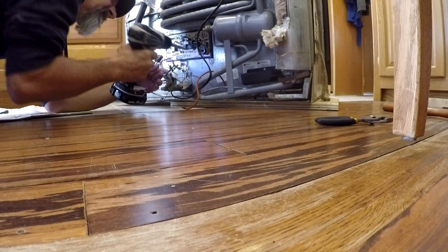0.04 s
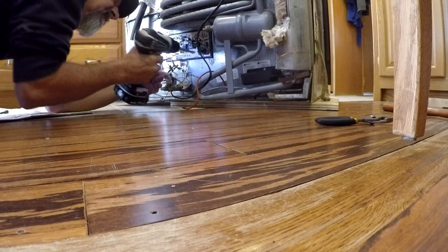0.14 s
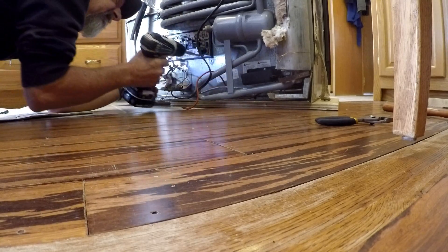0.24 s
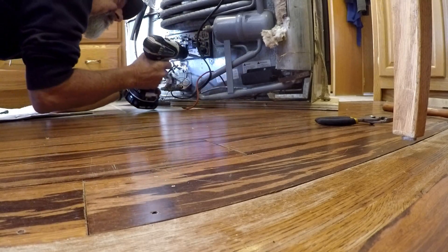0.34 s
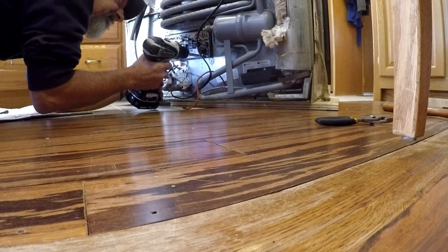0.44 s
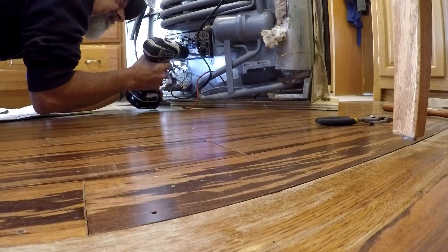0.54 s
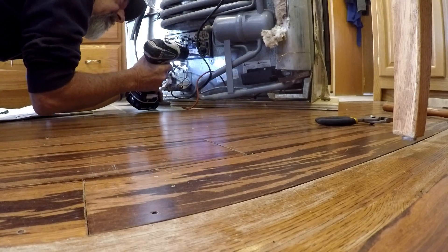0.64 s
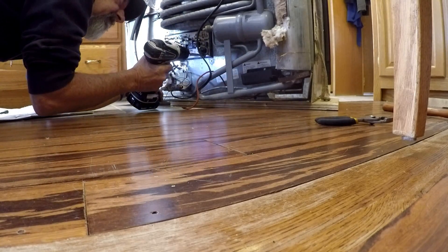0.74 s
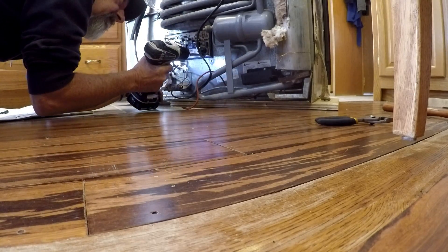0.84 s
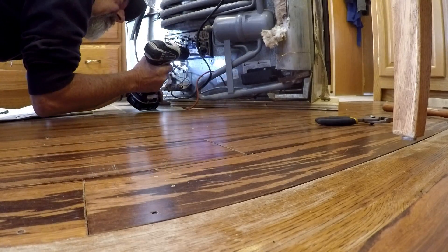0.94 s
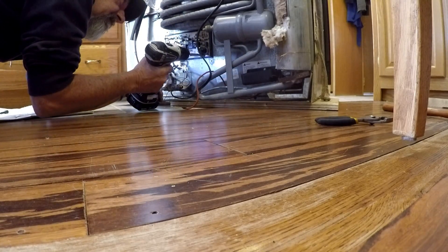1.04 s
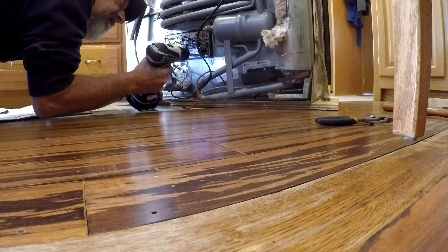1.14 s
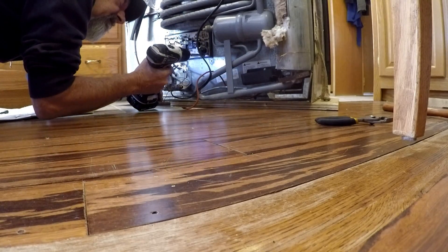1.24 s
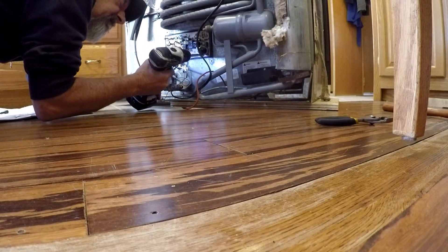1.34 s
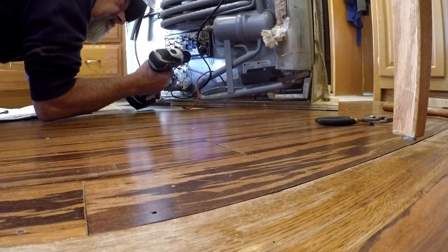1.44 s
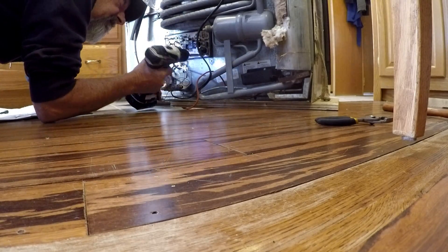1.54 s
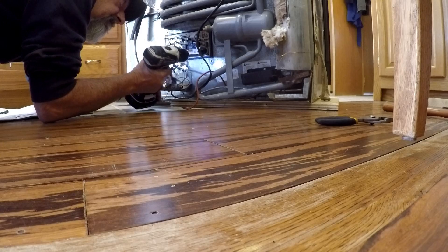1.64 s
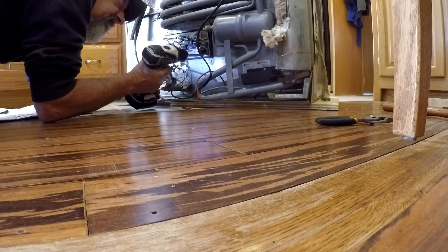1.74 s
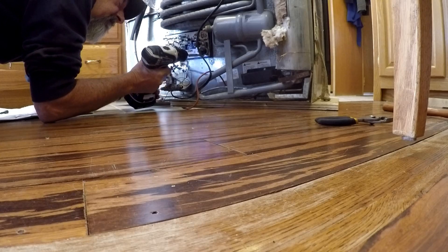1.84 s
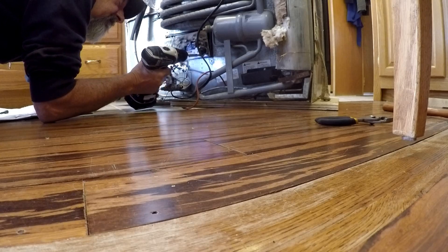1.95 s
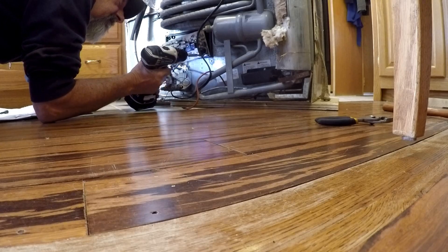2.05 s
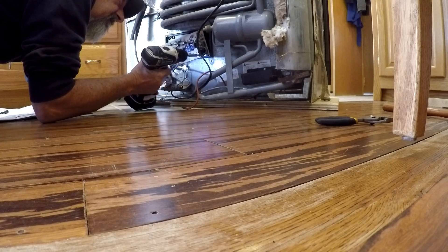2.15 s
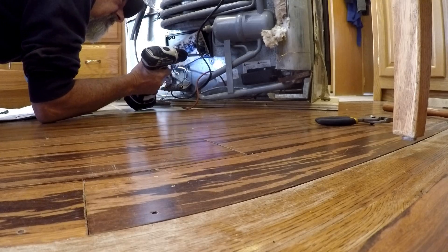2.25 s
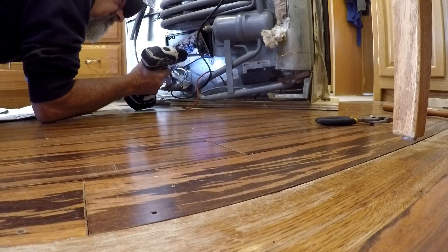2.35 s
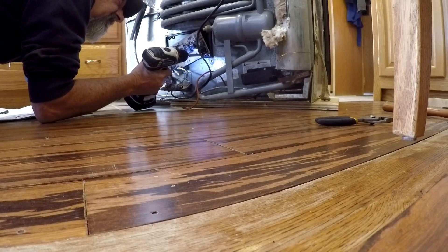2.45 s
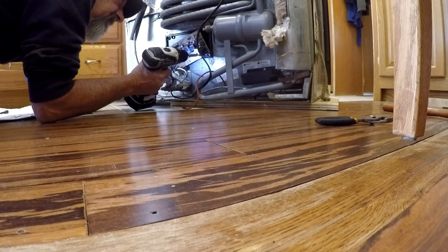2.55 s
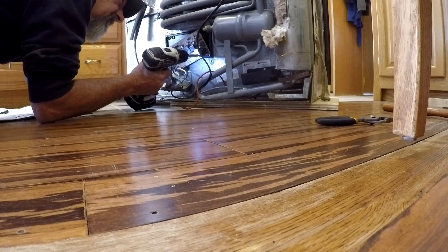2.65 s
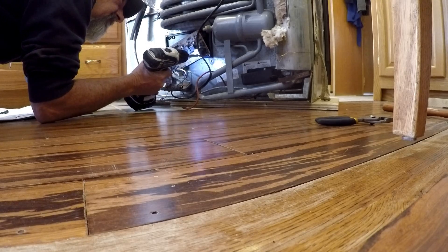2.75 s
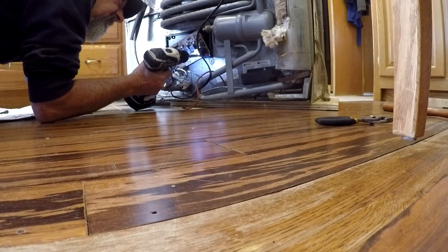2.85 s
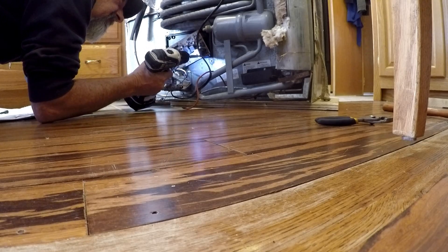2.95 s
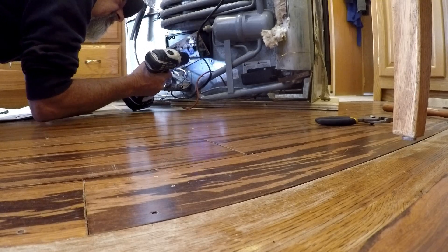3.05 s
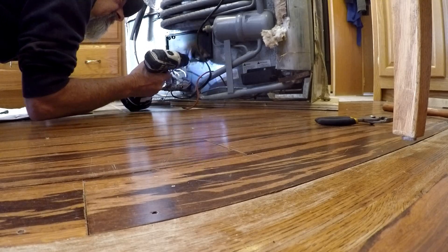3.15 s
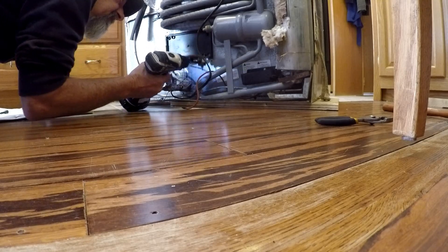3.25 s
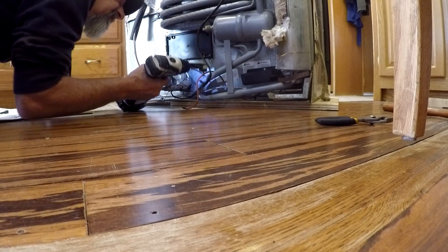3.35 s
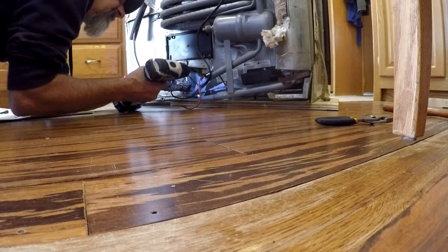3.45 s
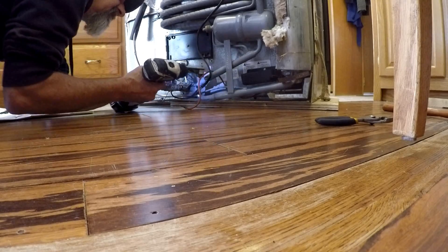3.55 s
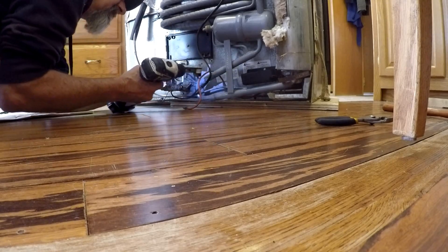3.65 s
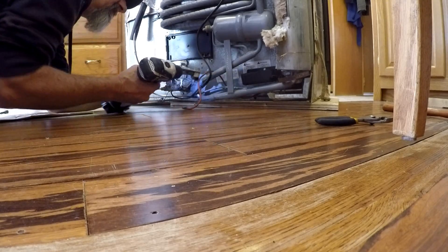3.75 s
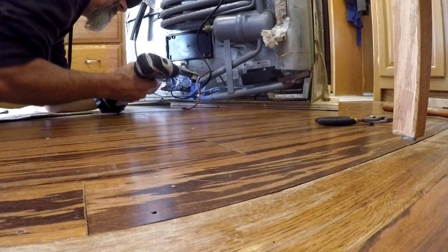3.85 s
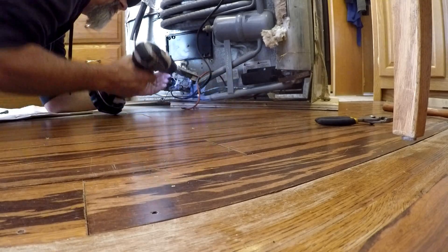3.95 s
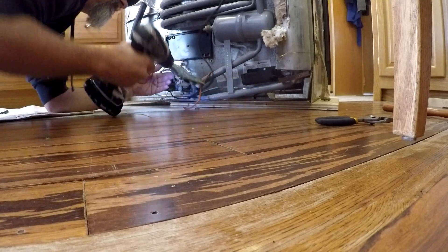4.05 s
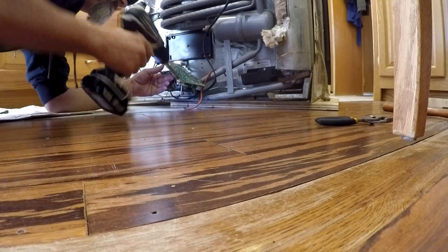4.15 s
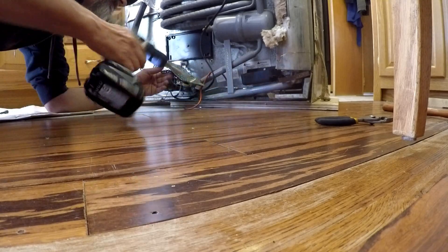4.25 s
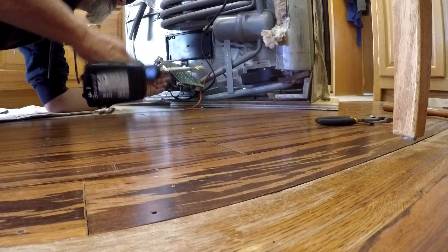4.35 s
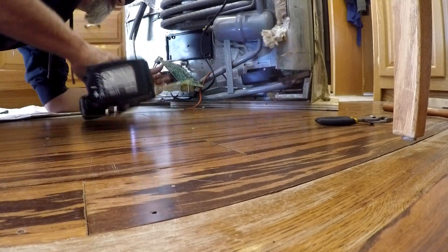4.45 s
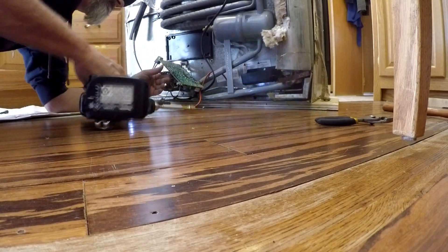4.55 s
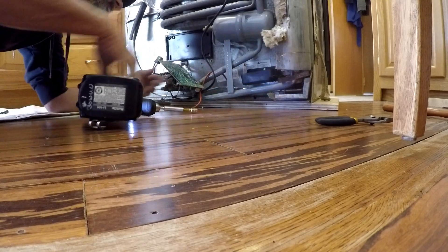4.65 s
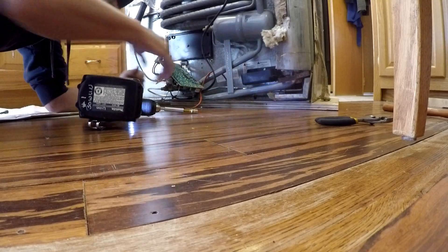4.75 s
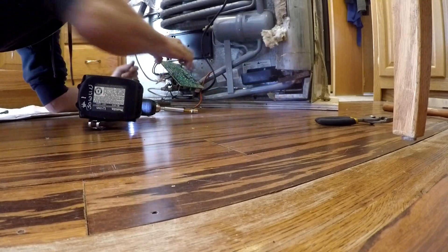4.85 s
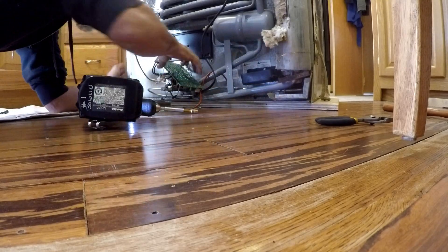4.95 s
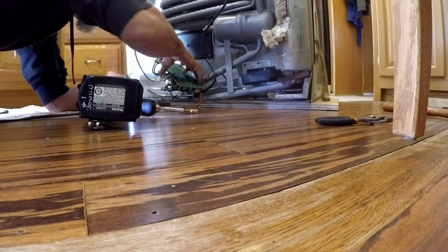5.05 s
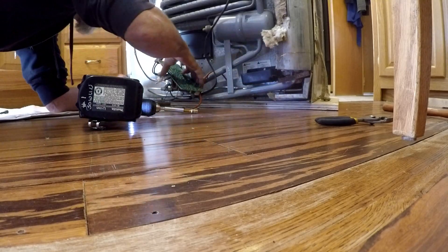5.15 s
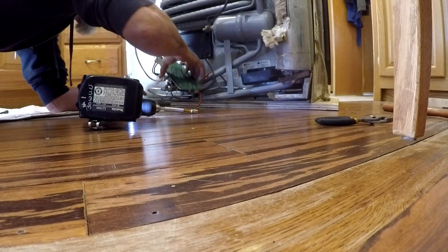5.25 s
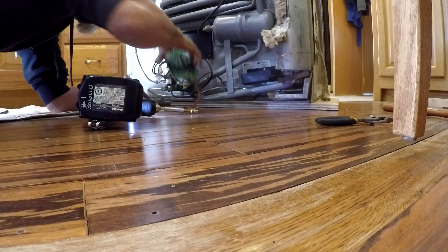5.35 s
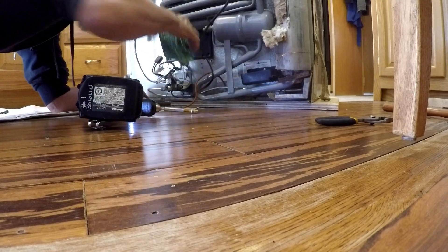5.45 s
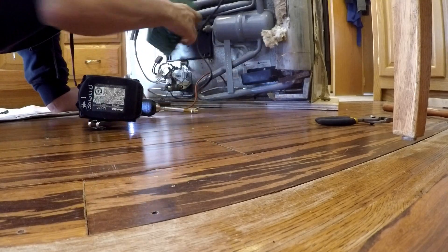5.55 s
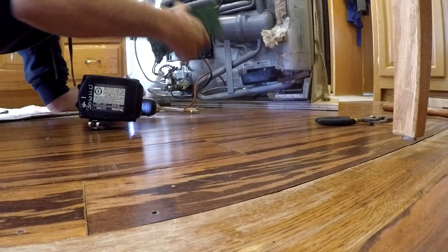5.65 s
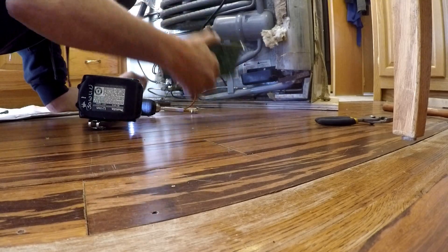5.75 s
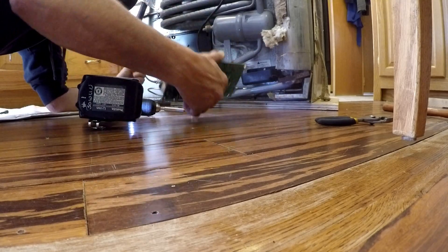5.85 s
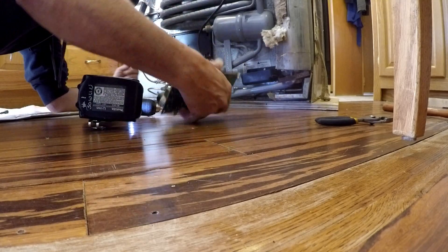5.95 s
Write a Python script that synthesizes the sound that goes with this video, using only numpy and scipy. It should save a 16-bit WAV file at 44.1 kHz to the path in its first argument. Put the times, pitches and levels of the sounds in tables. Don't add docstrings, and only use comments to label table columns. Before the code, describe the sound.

Knocks and thuds on floorboards, a cordless drill blips then whirs for about a second, then metal parts clink and the drill is set down.

```python
import sys
import numpy as np
from scipy import signal
from scipy.fft import rfft, irfft, next_fast_len
from scipy.io import wavfile
from scipy.ndimage import uniform_filter1d, map_coordinates

SR = 44100
rng = np.random.default_rng(int(sys.argv[2]) if len(sys.argv) > 2 else 0)


def generate_wav(sig):
    pcm = np.round(np.clip(np.atleast_2d(sig).T, -1, 1) * 32767).astype(np.int16)
    wavfile.write(sys.argv[1], SR, pcm)


def boost_factor(decibels):
    exponent = np.asarray(decibels, float) / 20
    return 10 ** exponent


N = 264600

# [f/Hz, density/dB per Hz]
BOARD_SPECTRUM = [(15, -45), (25, 1), (65, -5.5), (98, 3), (156, -2.5), (177, -12), (193, -4.5), (254, -6),
                  (331, -8), (379, -17), (430, -14.5), (500, -28), (650, -38), (1100, -120)]
MURMUR_SPECTRUM = [(210, -23.5), (350, -1.5), (431, -14.5), (538, -5), (854, -11), (1020, -14),
                   (1130, -18.5), (2200, -27.5), (2860, -36), (4840, -120)]
RUSTLE_SPECTRUM = [(880, -8), (1500, -3), (2310, 2.5), (3720, -1.5), (4940, -2), (5690, -3), (9880, -8.5),
                   (12800, -40), (21700, -120)]
# [f/Hz, level/dB]
FRIDGE_LINES = [(191.3, -2), (265.2, -7.5), (57.7, -6.5)]
# [t/s, gain/dB]
ROOM_GAIN = [(0, -7), (.27, -1), (.45, -2), (.75, 1), (1.27, 4), (1.6, 5), (1.82, 0), (2.06, -10), (3.3, 2),
             (3.5, -7), (3.72, -4), (3.95, -7), (4.5, -3), (4.76, -1), (5.05, -8), (5.31, -3), (5.52, 1),
             (6, 1)]
# [(start/s, end/s, level/dB, swell/dB per s), bands of (f/Hz, width/Hz, level/dB)]
DRAGS = [
    ((-.1, .42, -61.5, 24), [(7720, 250, -1), (4750, 1700, -3)]),
    ((1.25, 2.02, -56, 5), [(2850, 96, 0)]),
    ((4.21, 4.375, -32.5, -3), [(2140, 410, 4), (3630, 460, 5), (5000, 900, 0), (7700, 700, 0), (9500, 900, -6.5)]),
    ((4.11, 4.31, -30, 6), [(262, 30, 0), (195, 24, -1)]),
    ((5.78, 5.87, -42.5, 8), [(1450, 900, 17), (2300, 880, -24)]),
]
# [t/s, peak/dB, f/Hz, joist level/dB]
BOARD_BLOWS = [(.804, -19, 206, -21), (1.035, -13, 196, -16), (1.059, -12.5, 348, -14),
               (1.197, -23, 183, -14), (1.345, -24, 194, -14), (1.536, -7, 261, -5.5),
               (1.584, -4, 205.5, -12), (1.601, .5, 220.6, -38), (1.619, -5, 235, -28),
               (1.831, -8, 203, -15), (1.896, -4, 201.5, -16), (1.995, -2, 274, -7),
               (3.416, -25.5, 172, -26), (3.482, -18.5, 179, -1.5), (4.105, -15, 269, -12),
               (4.15, -16, 190, -1), (4.204, 1, 175, -24), (4.229, -19, 191.5, -1.5),
               (4.344, -21.5, 195, -3.5), (4.747, 1.5, 196, -12), (4.7475, -8, 330, -30),
               (4.8145, -11, 340, -30), (4.21, -6, 175, -30), (3.612, -26, 190, 3), (3.672, -24, 200, 1),
               (1.66, -15, 330, -20), (4.816, -10, 194, 1), (4.85, -22, 159, 4), (4.881, -18.5, 171, 4),
               (4.91, -29, 132, 10), (4.997, -22, 141, 4)]
# [t/s, peak/dB, f/Hz]
BIT_JOLTS = [(1.879, -16, 240), (1.909, -12, 330), (1.921, -11, 260), (1.941, -9, 190), (3.43, -18, 200),
             (2.167, -21, 147), (2.289, -15, 310), (2.384, -15, 178), (2.445, -21, 277), (2.579, -13, 317),
             (2.636, -7, 200), (2.674, -10, 204.4), (2.73, -9, 302), (2.771, -15, 319), (2.929, -18, 310),
             (3.033, -17, 291), (3.189, -12, 332), (3.2, -12, 196), (3.255, -12, 190), (3.309, -19, 132)]
# [f/Hz, t60/s]
JOIST_MODE = (101.2, 0.18)
# [t/s, peak/dB, body level/dB, t60/s]
PANEL_HITS = [(.7352, -40, 8, .12), (.8104, -42.5, 9, .14), (.8939, -33.5, -6, .08),
              (1.0535, -27.5, 1, .07), (1.1694, -48, 19.5, .13), (1.3389, -41, -14, .07),
              (1.3694, -38, 6, .053), (1.5354, -22, 2, .18), (1.5844, -26, 0, .042),
              (1.6008, -13.5, 1, .098), (1.6457, -32, -1, .12), (1.8477, -36, 3, .2),
              (1.9944, -24, 1, .052), (2.0946, -41, 4, .12), (2.1176, -26, -5, .1),
              (3.4174, -8.5, -6.5, .06), (3.6591, -29, -15, .12), (3.8372, -34.5, -6, .063),
                  (4.4094, -48.5, 17, .08), (4.8145, -27.5, 2, .07), (4.8823, -15, -2, .07),
                  (4.9896, -30, 8, .092), (5.0404, -35.5, 10, .1), (5.2854, -59.5, 30, .04),
                  (5.5494, -39, 9.5, .13), (5.6974, -27.5, -4, .08), (5.7768, -28, -25, .2),
                  (5.8204, -29, -5, .11), (5.901, -32, -20, .07)]
# [t/s, peak/dB, ring f/Hz, mid level/dB, t60/s]
PLASTIC_HITS = [(.6983, -37.5, 2400, -3, .07), (1.7569, -42, 4400, 5, .05), (1.712, -48, 2800, 10, .07),
                (1.538, -27, 2050, 6, .1), (1.6045, -20, 2000, 3, .1), (1.8986, -15, 2000, 7, .08),
                (3.4381, -14, 2090, 1, .048), (3.5049, -11, 3450, -8, .095), (3.5734, -40, 2770, 4, .056),
                (3.6062, -29.5, 3380, 1, .07), (3.6292, -22, 1810, -5.5, .055),
                (3.6794, -26, 2370, -10, .084), (3.7005, -32, 2540, -1, .088),
                (4.0043, -13, 2520, -4, .042), (4.0721, -19.5, 2270, -1, .065),
                (4.1061, -14, 2590, -2.5, .052), (4.1979, -16, 2330, -2, .03), (4.2028, -17, 1910, -2, .05),
                (4.1575, -26, 2500, -2, .05), (4.03, -36, 2500, -8, .08), (4.224, -24, 2600, 0, .04),
                (4.328, -27, 2000, 3, .04), (4.333, -27, 4000, 0, .04), (4.359, -24, 2310, 3, .06),
                (4.8335, -39, 4000, 0, .04), (4.959, -40, 4100, 0, .03), (4.2832, -20, 3790, -3, .11),
                (4.3525, -21, 2870, -8, .06), (4.3694, -33, 2210, 7, .076), (4.4812, -36, 3080, -2, .09),
                (4.7054, -46.5, 2300, 14, .07), (4.8479, -15.5, 2680, -3, .05),
                (4.9097, -15, 2610, -3, .045), (4.9654, -50, 2700, 15, .044),
                (5.6064, -45.5, 2400, 13, .07)]
# [t/s, peak/dB, ring f/Hz, mid level/dB, t60/s]
STEEL_HITS = [(1.8743, -21, 6680, -6, .15), (2.139, -18, 3900, -3, .07), (3.4835, -7.5, 8130, -16, .063),
              (3.7289, -10, 8030, -21, .14), (3.8798, -7.5, 7900, -10, .1), (3.885, -9, 7220, -14, .1),
              (3.8965, -18, 7670, -12, .1), (3.933, -18, 4700, -8, .05), (3.9265, 0, 7000, -13, .07),
              (3.9514, -4.5, 7060, -20, .065), (4.148, -24, 6250, -8, .05), (4.2297, -15, 7900, -6, .06),
              (4.2465, -19, 7900, -8, .05), (4.298, -24, 8500, -10, .04), (4.306, -24, 8500, -10, .04),
              (4.343, -22, 7500, -20, .03), (4.3658, -22, 5800, -12, .04), (4.256, -25, 5380, -10, .11),
              (4.3155, -20, 3850, -8, .037), (4.7465, -19, 4000, 3, .05), (5.5248, -16, 4660, -14, .085),
              (5.6531, -24, 6560, -12, .15)]
# [f/Hz, level/dB, t60/s]
SHELL_MODES = [(720.5, 1, 0.1), (999, 0.5, 0.093), (1230, -16.5, 0.13)]
# [t/s, level/dB, f/Hz, t60/s]
KNOCKS = [(0.814, -29, 1010, .1), (1.172, -25, 1012, 0.13), (1.899, -15, 780, .07), (2.139, -15, 900, .05),
          (3.884, -31, 2692, .2), (3.884, -24, 5001, .06), (3.927, -19, 800, .08), (3.927, -17, 3600, .025),
          (3.952, -20, 3600, .02), (4.0045, -14, 2500, .015), (4.222, -24, 9700, .03),
          (4.884, -19, 720, .1), (4.991, -25, 720, .1), (4.993, -30, 3200, .03), (5.042, -27, 750, .1),
          (4.748, -17, 720, .06), (4.849, -20, 5400, .015), (4.911, -20, 5200, .015),
          (3.4172, -12, 900, 0.035), (3.4175, -16, 2000, .02), (3.484, -30, 8130, .1),
          (3.506, -28, 8130, .1), (4.2297, -21, 7900, .03), (4.2465, -21, 7900, .035),
          (4.257, -28, 5380, .06), (4.2297, -23, 3630, .04), (3.815, -38, 2600, .03),
          (4.752, -16, 8060, 0.082), (4.885, -24, 8050, 0.046), (5.558, -29, 1050, .05),
          (5.702, -33, 1150, .04)]
# [f/Hz, level/dB, t60/s]
SCREW_MODES = [(2939, -24, .15), (5965, -10, .22), (6300, -3, .05), (6568, -8, .1), (7111, -5, .08),
               (7620, -12, .3), (7865, -15, .3), (5000, -14, .1), (8032, -2, .07), (8780, -6, .06),
               (9582, -8, .08)]
# [t/s, level/dB]
SCREW_IMPACT = (3.729, -17.5)
# [shaft start/s, brake/s, top mesh f/Hz, spin-up/s, braking/Hz per s2]
BLIP_TRIGGER = (1.9, 1.96, 2060, .014, 3e6)
RUN_TRIGGER = (2.118, 3.36, 2872, .039, 6e4)
# [t/s, air and brush noise level/dB]
BLIP_EFFORT = [(1.878, -35), (1.908, -22.5), (1.972, -21), (1.979, -29), (1.997, -36)]
RUN_EFFORT = [(2.121, -33), (2.142, -22), (2.166, -20.5), (2.24, -22.5), (2.572, -23.5), (2.584, -21),
              (2.604, -31), (2.926, -24), (3.395, -23), (3.416, -29), (3.432, -38)]
MESH_MULTIPLES = [.3, 1, 2, 3, 4, 5]
# [level while screw bites/dB, level once free/dB, swell after/dB per s]
MESH_BITE = [(3, 1, 1), (3.5, .5, 0), (4, -2.5, 10), (-8, -3.5, 9), (0, 0, 0), (-6, -6, 0)]
# [gain at standstill/dB], nothing at full speed
MESH_STRAIN_DB = [10, 1.5, 3, 34, 14, 12]
# [f/Hz, level/dB]
CASING_RADIATION = [(500, -4), (860, 2.5), (1500, 10), (2200, 9), (2870, -.5), (4000, 11), (5000, 7.5),
                    (5730, -0.5), (6500, -12), (8200, -9), (8600, 8.5), (9000, -5)]
# [f/Hz, density/dB per Hz]
WHIR_SPECTRUM = [(240, -22.5), (400, -13.5), (582, -2.5), (804, -12.5), (871, -8.5), (907, -7.5),
                 (1320, -12), (2800, -11), (3240, -3), (6430, -2.5), (7350, -1.5), (8410, -2.5), (9880, -9),
                 (12800, -13), (21700, -120)]
# [f/Hz, width/Hz, level/dB]
CASING_MODES = [(6550, 470, 2), (2300, 200, 9.5), (8480, 2100, -3.5)]
SHAKEN_MODES = [(203, 34, 2.5), (324, 36, 2), (570, 90, -5), (700, 60, -10)]


def seconds(length):
    return np.arange(length) / SR


def sine(hz, t):
    return np.sin(2 * np.pi * hz * t)


def unit(x):
    return x / np.sqrt(np.mean(x ** 2) + 1e-20)


def along(points, hz):
    f, v = np.transpose(points)
    return np.interp(np.log(hz + 1), np.log(f + 1), v)


def curve(rows):
    s, value = np.transpose(rows)
    return np.interp(seconds(N), s, value)


def wobble(rate_hz):
    coarse = np.arange(0, N + 8, 8)
    knots = rng.standard_normal(int(N * rate_hz / SR) + 4)
    return np.interp(np.arange(N), coarse, map_coordinates(knots, [coarse * rate_hz / SR]))


def filtered(x, response):
    m = next_fast_len(x.shape[-1] + 2048)
    return irfft(rfft(x, m) * response(np.fft.rfftfreq(m, 1 / SR)), m)[..., :x.shape[-1]]


def resonances(bands):
    return lambda f: sum(boost_factor(db) * 1j * f * w / (c * c - f * f + 1j * f * w) for c, w, db in bands)


def rush(spectrum, grain_db, grain_hz):
    flicker = boost_factor(grain_db * wobble(grain_hz)) * rng.standard_normal(N)
    return unit(filtered(flicker, lambda hz: boost_factor(along(spectrum, hz))))


def add(track, s, sound):
    part = track[round(s * SR):][:len(sound)]
    part += sound[:len(part)]


def lingering(rows, db, t60_s):
    out, t = np.zeros(N), seconds(SR // 2)
    for s, peak_db, *_ in rows:
        add(out, s, boost_factor(peak_db + db - 60 * t / t60_s) ** 2)
    return out


def bed_level(quiet_db, rides, driven_db, running):
    return np.hypot(boost_factor(quiet_db + rides * curve(ROOM_GAIN)), running * boost_factor(driven_db))


def fridge():
    hum = np.zeros(N)
    for hz, db in FRIDGE_LINES:
        phase = 2 * np.pi * np.cumsum(hz * (1 + 0.0115 * wobble(15))) / SR
        hum += boost_factor(db + 1.2 * wobble(9)) * np.sin(phase)
    return boost_factor(-30 + .9 * curve(ROOM_GAIN)) * hum


def board_rumble(lumps, running):
    after = lingering(BOARD_BLOWS, db=-20, t60_s=.5)
    level = np.sqrt(bed_level(-29.5, .75, -24, running) ** 2 + after)
    return boost_factor(-3.0) * level * unit(lumps * rush(BOARD_SPECTRUM, grain_db=2.0, grain_hz=50))


def murmur(lumps, running):
    level = bed_level(-40, 1.1, -34.5, running)
    return level * unit(lumps * rush(MURMUR_SPECTRUM, grain_db=2, grain_hz=60))


def rustle(running):
    stir = lingering(PLASTIC_HITS, db=-31, t60_s=.45)
    level = np.sqrt(bed_level(-50, .6, -40, running) ** 2 + stir)
    return level * rush(RUSTLE_SPECTRUM, grain_db=1.5, grain_hz=30)


def surroundings(chuck, running):
    lumps = boost_factor(3.8 * chuck + 1.28 * wobble(18))
    return fridge() + board_rumble(lumps, running) + murmur(lumps, running) + rustle(running)


def drags():
    out, t = np.zeros(N), seconds(N)
    for (start, end, db, swell_db), bands in DRAGS:
        outside_s = np.maximum(np.maximum(start - t, t - end), 0)
        edge_db = 30 * outside_s / (end - start) / .2
        level_db = db + swell_db * (np.clip(t, start, end) - start) - edge_db
        grit = boost_factor(4 * wobble(400) + 2.9 * wobble(70)) * rng.standard_normal(N)
        out += boost_factor(level_db) * unit(filtered(grit, resonances(bands)))
    return out


def thuds():
    out, t = np.zeros(N), seconds(SR // 4)
    joist_hz, joist_t60_s = JOIST_MODE
    joist = boost_factor(-60 * t / joist_t60_s) * sine(joist_hz, t)
    blows = [(s, db, hz, .048 * boost_factor(-.35 * db), joist_db) for s, db, hz, joist_db in BOARD_BLOWS]
    jolts = [(s, db, hz, .1, -15) for s, db, hz in BIT_JOLTS]
    for s, db, hz, t60_s, joist_db in blows + jolts:
        board = sine(hz, t) + 0.45 * sine(1.6 * hz, t)
        blow = boost_factor(-60 * t / np.clip(t60_s, .025, .16)) * board + boost_factor(joist_db) * joist
        add(out, s, boost_factor(db - 0.5) * blow * (1 - np.exp(-t / 0.0021)))
    return out


def contacts():
    panel = [(s, db, .6 * body_db - 1.5, body_db, 960, t60_s)
             for s, db, body_db, t60_s in PANEL_HITS]
    parts = [(s, db, mid_db, mid_db - 11, hz, t60_s) for s, db, hz, mid_db, t60_s in PLASTIC_HITS]
    steel = [(s, db, mid_db, mid_db - 1.5, hz, t60_s) for s, db, hz, mid_db, t60_s in STEEL_HITS]
    return panel + parts + steel


def clinks():
    out, t = np.zeros(N), seconds(SR // 7)
    rise = 1 - np.exp(-t / .001)
    for s, db, mid_db, low_db, ring_hz, t60_s in contacts():
        t60_s = np.clip(t60_s, .015, .2)
        tilt = [(200, -11), (600, low_db + 16), (1200, low_db + 5.5), (2500, mid_db + 6),
                (5000, -4.5), (9000, -7.5)]
        modes = [(ring_hz, 300, 5)] + [(hz, 300, 4) for hz in rng.uniform(1500, 9800, size=5)]
        colour = resonances(modes)
        chatter = boost_factor(2 * np.repeat(rng.standard_normal(len(t)), repeats=60)[:len(t)])
        noise = filtered(rng.standard_normal(len(t)),
                         lambda f: boost_factor(along(tilt, f) - 3) * (1 + np.abs(colour(f))))
        decay = boost_factor(4 - 60 * t / 0.013) + boost_factor(-5.5 - 60 * t / t60_s) + boost_factor(-24 - 60 * t / .3)
        crack = chatter * noise * decay
        ring = boost_factor(along(tilt, ring_hz) - 9 - 60 * t / (0.47 * t60_s)) * sine(ring_hz, t)
        for hz, shell_db, shell_t60_s in SHELL_MODES:
            level_db = low_db + shell_db - 12 + rng.normal(0, 1.5)
            ring += boost_factor(level_db - 60 * t / shell_t60_s) * sine(hz * rng.normal(1, 0.027), t)
        add(out, s, boost_factor(db - 3) * (crack + ring) * rise)
    return out


def pinging(rows, twin):
    out, t = np.zeros(N), seconds(SR // 3)
    for s, db, hz, t60_s in rows:
        tone = sine(hz, t) + twin * np.sin(2 * np.pi * hz * 1.0039 * t - 1.9)
        add(out, s, boost_factor(db - 60 * t / t60_s) * tone * (1 - np.exp(-t / 0.00078)))
    return out


def knocks():
    return pinging(KNOCKS, twin=0)


def dropped_screw():
    s, hit_db = SCREW_IMPACT
    return pinging([(s, hit_db + db, hz, t60_s) for hz, db, t60_s in SCREW_MODES], twin=.6)


def mesh_speed(trigger):
    start, brake, top_hz, spin_s, braking = trigger
    t = seconds(N)
    since = np.maximum(t - start, 0)
    spin_hz = top_hz * (1 - np.exp(-since / spin_s))
    creep_hz = 45 * np.exp(-since / .22)
    return np.maximum(spin_hz - creep_hz - braking * np.clip(t - brake, 0, .1) ** 2, 100)


def gear_whine(mesh_hz, turn):
    free_s, settle_s = 2.6, .25
    since_free = seconds(N) - free_s
    load = np.clip(1 - since_free / settle_s, 0, 1)
    slow = 1 - mesh_hz / 2900
    blur = .2 + 1.3 * slow
    whine = np.zeros(N)
    for k, (bite_db, free_db, swell_db), strain_db in zip(MESH_MULTIPLES, MESH_BITE, MESH_STRAIN_DB):
        load_db = bite_db * load + free_db * (1 - load) + swell_db * np.maximum(since_free, 0)
        level_db = along(CASING_RADIATION, k * mesh_hz) + load_db + strain_db * slow
        flutter_db = 1.6 * wobble(29.92)
        whine += boost_factor(level_db + flutter_db) * np.sin(k * turn + blur * k * wobble(150))
    return whine


def motor(trigger, effort, whine_db):
    t = seconds(N)
    brake, top_hz = trigger[1:3]
    mesh_hz = mesh_speed(trigger)
    turn = 2 * np.pi * np.cumsum(mesh_hz * (1 + 0.00041 * wobble(40))) / SR
    chuck = np.sin(turn / 160)
    speed = (mesh_hz / top_hz) ** 2
    on = np.clip(np.minimum(t - effort[0][0], effort[-1][0] - t) / 0.013, 0, 1)

    casing = resonances(CASING_MODES)
    air = rush(WHIR_SPECTRUM, grain_db=1, grain_hz=900)
    whir = unit(filtered(air, lambda f: 1 + np.abs(casing(f))))
    throb = 1 + 0.078 * np.sin(turn / 10)
    whir = boost_factor(curve(effort) + 1.1 * wobble(29.64)) * throb * whir

    whine_db = whine_db - 70 * np.maximum(t - brake, 0)
    whine = boost_factor(whine_db + 1.5) * speed * gear_whine(mesh_hz, turn)

    kicks = boost_factor(2 * chuck + 2.6 * wobble(25.01)) * rng.standard_normal(N)
    shake = boost_factor(-24.5) * (mesh_hz / 2900) ** 2 * unit(filtered(kicks, resonances(SHAKEN_MODES)))
    return on * (whir + whine + shake), on * chuck, on * speed


def scene():
    blip, _, blip_speed = motor(BLIP_TRIGGER, BLIP_EFFORT, whine_db=-47)
    run, chuck, run_speed = motor(RUN_TRIGGER, RUN_EFFORT, whine_db=-39)
    mono = surroundings(chuck, blip_speed + run_speed) + drags() + thuds() + clinks()
    mono = mono + knocks() + dropped_screw() + blip + run
    return 2 * np.array([mono, mono])


def top_cut(x):
    return signal.sosfilt(signal.butter(12, 15300, fs=SR, output="sos"), x)


def record(dry):
    mic = filtered(dry[1], lambda hz: hz / np.hypot(hz, 30) / (1 + (hz / 10050) ** 200))
    mic = mic / (1 + np.abs(mic) ** 14) ** (1 / 14)
    leak = filtered(mic, lambda hz: boost_factor(-22.5) / (1 + 1j * hz / 330))
    power = np.abs(uniform_filter1d(mic ** 2, size=9000))
    leak = leak * boost_factor(-8 / (1 + (power / boost_factor(-34)) ** 2))
    treble = uniform_filter1d(filtered(mic, lambda hz: hz > 3000) ** 2, size=1500)
    quiet = 1 / (1 + (treble / boost_factor(-71)) ** 2)
    hiss = filtered(rng.standard_normal((2, N)), lambda hz: 1 / (1 + (hz / 14600) ** 30))
    hiss = hiss * [boost_factor(-69.5) * np.ones(N), boost_factor(-52.5) * quiet]
    return top_cut(np.array([leak, mic]) + hiss)


dry = scene()
out = record(dry)
generate_wav(out)
```